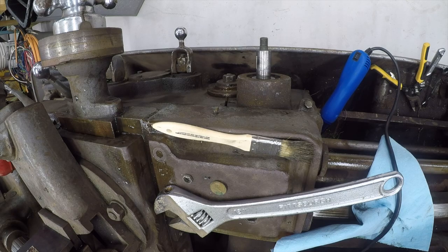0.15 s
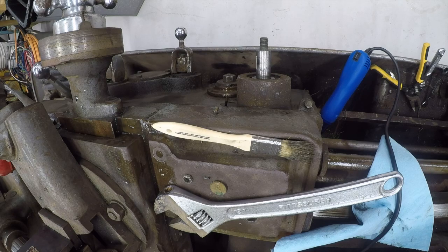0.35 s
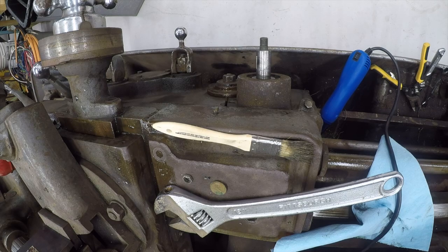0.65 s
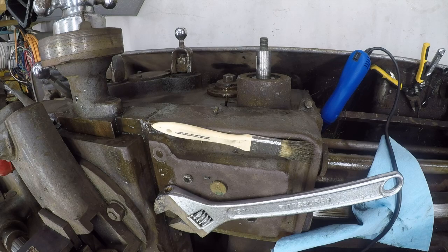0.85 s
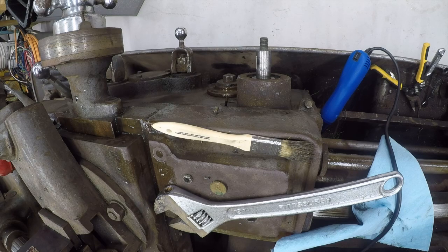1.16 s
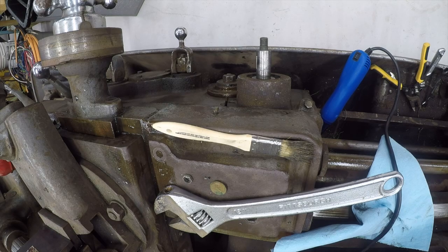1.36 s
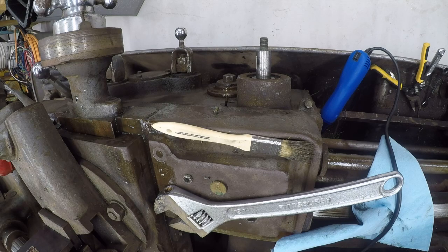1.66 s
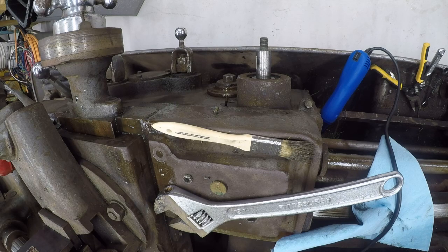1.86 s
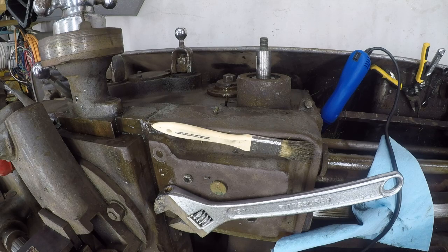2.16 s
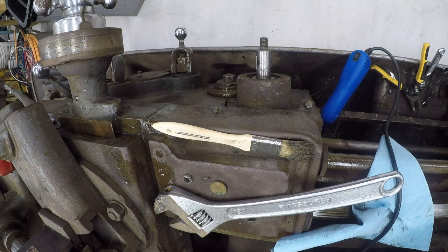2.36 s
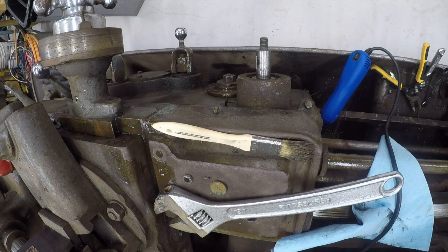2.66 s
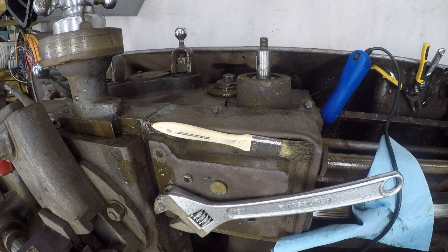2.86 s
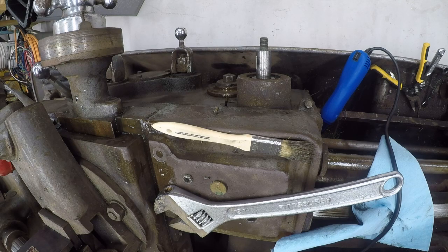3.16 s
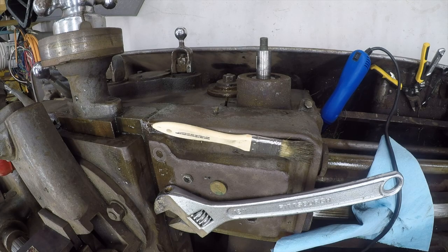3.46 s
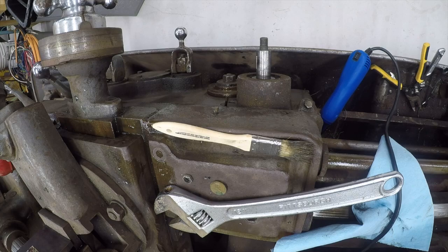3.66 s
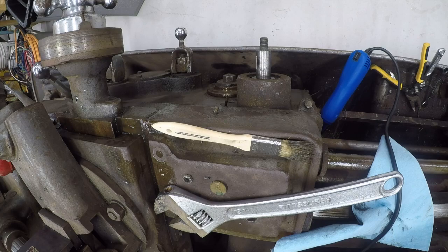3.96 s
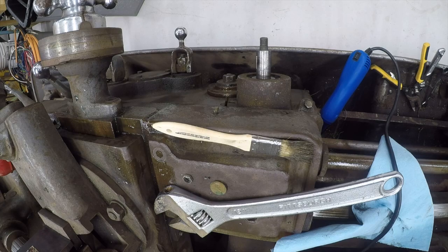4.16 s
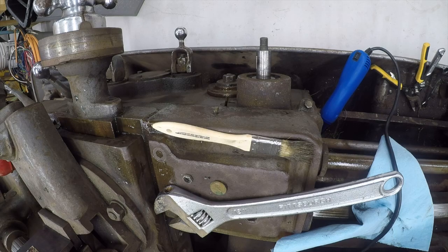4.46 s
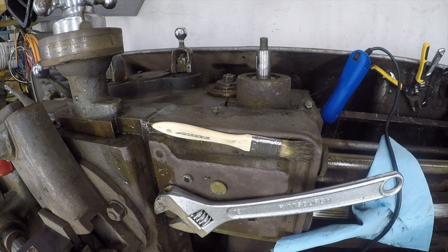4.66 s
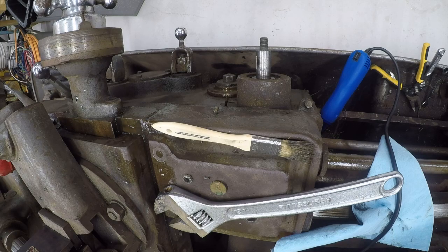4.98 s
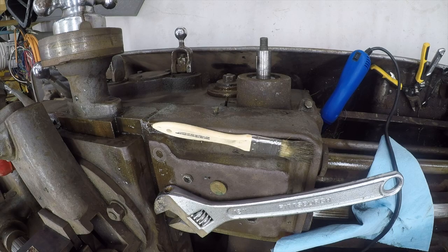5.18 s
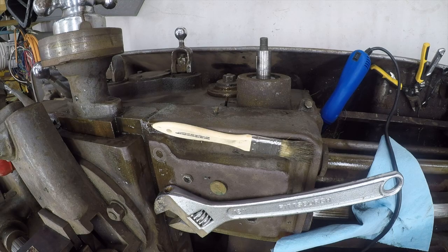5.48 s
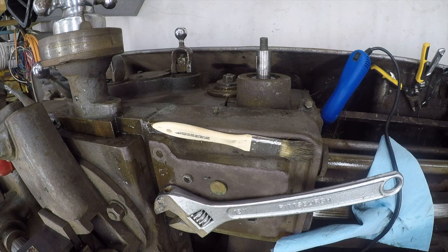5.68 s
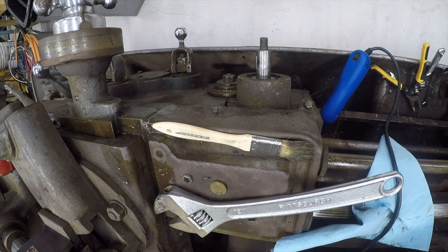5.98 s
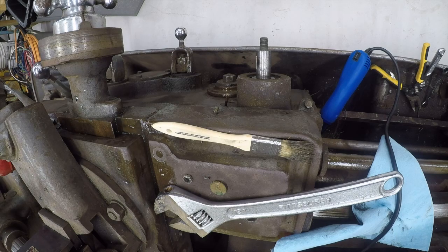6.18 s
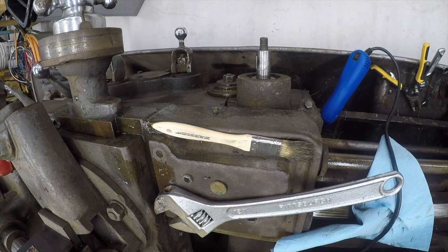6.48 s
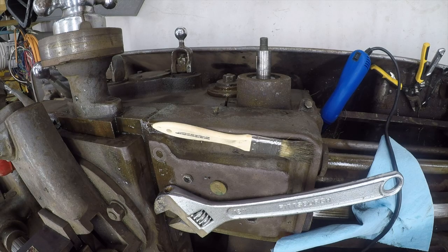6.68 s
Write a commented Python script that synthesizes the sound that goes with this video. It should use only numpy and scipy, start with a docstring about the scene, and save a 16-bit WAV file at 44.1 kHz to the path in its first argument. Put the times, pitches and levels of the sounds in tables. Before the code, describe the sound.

In a workshop, ventilation rumbles and hums steadily while someone goes through a nearby steel drawer cabinet. First a drawer clatters open, its loose tools ringing briefly. A lull follows, then a louder run of metallic knocks and a booming slam. Afterwards come softer clinks, hissy scraping from the runners and one last light knock, each with a short room echo.

```python
"""A steel drawer cabinet is opened, rummaged in and banged shut in a workshop.
Knocks and scraping runners shake the sheet steel into a noisy rattle; the drawer rings, the large
panels boom and loose tools clink. Once, a faint high whistle swells in. The room reverberates.
Behind it, ventilation rumbles and drives the room's lowest resonance into a wavering hum."""
import sys
import numpy as np
from scipy import signal
from scipy.fft import rfft, irfft, next_fast_len
from scipy.io import wavfile
from scipy.ndimage import uniform_filter1d, map_coordinates

SR = 44100
rng = np.random.default_rng(int(sys.argv[2]) if len(sys.argv) > 2 else 0)


def persist_wave(psi):
    """Save psi, clipped to +-1, as 16-bit WAV."""
    counts = np.round(np.clip(psi, -1, 1) * 32767).astype(np.int16)
    wavfile.write(sys.argv[1], SR, np.atleast_2d(counts).T)


N = 301203


# Drawer knocks: t/s, bright level/dB, dull re bright/dB, rattle t60/s, ring re bright/dB
KNOCKS = [(0.0867, -25, -3, 0.52, -24.5), (0.2027, -14.5, -3.5, .1, -29), (0.246, -8.5, -8, 0.37, -27),
          (0.3735, -44.5, 19.5, 0.36, -22), (0.428, -29, -5, 0.4, -24), (0.6477, -31, 0.5, 0.23, -36),
          (2.909, -32, -26, 0.069, -16), (3.1945, -14, -6, 0.49, -24), (3.227, -17, -16, 0.089, -33),
          (3.383, -9.5, -2, 0.085, -32), (3.3925, -15.5, 2.5, 0.43, -34), (3.5955, -25.5, -20, 0.25, -30),
          (3.7653, -32.5, -4, 0.097, -37), (3.959, -31, 4.5, 0.45, -28), (4.02, -33, 1, .1, -30),
          (4.035, -29.5, 2, 0.14, -28), (4.6194, -45, 0, .12, -34), (4.973, -31, -14, 0.058, -22),
          (5.0005, -39, -8, 0.16, -28), (5.3522, -37.5, -12, 0.75, -32), (5.7736, -44.5, 6, .12, -30),
          (6.347, -34.5, 7.5, 0.34, -34)]

def knocks(grit):
    """Bright, dull and crack power envelopes: first contact cracks, the blow fades, loose parts rattle."""
    blow_db, blow_t60_s, crack_db, crack_t60_s = -9, 0.18, -13.5, 0.026
    rattle_db, dull_stretch, hard_db = -11, 1.36, -14
    bright, dull, crack = np.zeros((3, N))
    for start, db, dull_db, t60, _ in KNOCKS:
        span = slice(round(start * SR), round(start * SR) + SR // 2)
        t = np.arange(len(grit[span])) / SR
        for power, level, age in (bright, db, t), (dull, db + dull_db, t / dull_stretch):
            blow = amp(blow_db - 60 * age / blow_t60_s) ** 2
            loose = grit[span] * amp(rattle_db - 60 * age / t60) ** 2
            power[span] += amp(level) ** 2 * (blow + loose) * (1 - np.exp(-age / 0.0024))
        contact_db = db + crack_db - 0.5 * max(hard_db - db, 0)  # soft blows crack less
        crack[span] += amp(contact_db - 60 * t / crack_t60_s) ** 2 * (1 - np.exp(-t / 0.0007))
    return bright, dull, crack


# Drawer slides: t/s, rise/s, hold/s, scrape level/dB, dull re scrape/dB
SLIDES = [(-.05, 0.04, 0.078, -46.5, 3), (3.087, 0.055, 0.053, -46, 4.5), (3.327, 0.046, 0.011, -37, 5),
          (3.535, 0.024, 0.029, -42, -18), (4.767, 0.075, .01, -50, -0.5), (5.464, 0.11, 0.023, -46, -2.5),
          (5.588, 0.12, 0.15, -36.5, -10), (5.838, 0.11, 0.12, -34.5, -9.5)]

def slides(grit):
    """Dull and scrape power envelopes: the drawer speeds up, holds and stops on juddering runners."""
    release_db_per_s = 226
    t = np.arange(N) / SR
    judder = amp(0.4 * wobble(22) + 0.6 * wobble(110))
    dull, scrape = np.zeros((2, N))
    for start, rise, hold, db, dull_db in SLIDES:
        speed_up = np.clip((t - start) / rise, 0, 1) ** 2
        release = amp(-release_db_per_s * np.maximum(t - start - rise - hold, 0))
        power = grit * (amp(db) * speed_up * release * judder) ** 2
        scrape += power
        dull += power * amp(dull_db) ** 2
    return dull, scrape


# Spectra of bright steel, dull steel, runners and first contact: f/Hz, relative density/dB
BRIGHT = [(1880, -11.5), (3200, -7.5), (3500, -7.5), (4870, -8), (6890, 1), (8150, -10), (9390, -12),
          (11100, -24), (12900, -29), (14900, -41)]
DULL = [(210, -24), (350, -2.5), (690, -7.5), (809, -5.5), (1000, -7), (1600, -8), (2000, -9),
        (2600, -17.5), (3800, -18.5), (4940, -37), (8360, -120)]
SCRAPE = [(1180, -42), (2000, -9), (2600, -7.5), (4190, -7.5), (5800, -1), (6600, 0.5), (7540, -3),
          (9950, -15.5), (11400, -29), (14900, -34)]
CRACK = [(300, -22), (1000, -16), (1700, -11), (3500, -23), (6800, 5), (9000, -2), (12000, -7),
         (14900, -19)]
# Cabinet stereo likeness: f/Hz, coherence
CABINET_COHERENCE = [(60, 0.57), (240, 0.99), (410, 0.99), (700, 0.58), (1200, 1), (2000, 0.6),
                     (3500, 0.84), (5810, 0.56), (9000, 0.3), (14500, .2)]
# Cabinet balance: f/Hz, left re right/dB
CABINET_BALANCE = [(240, 0.0), (410, 2.5), (700, -3.5), (1200, -4), (2000, -1.5), (3500, -2), (5810, -0.5),
                   (9000, -3.5), (14500, 3)]
# Cabinet phase: f/Hz, left lead/rad
CABINET_LEAD = [(300, -0.5), (700, 0.7), (1200, 1.1), (2000, 1.05), (3600, -0.34), (5800, -1), (9200, -1.5),
                (12500, -3)]

def rattle():
    """Knocks and slides shake sheet steel whose modes are too dense to hear apart."""
    grit = amp(0.67 * wobble(60) + 0.32 * wobble(250)) ** 2  # uneven contact
    bright, knock_dull, crack = knocks(grit)
    slide_dull, scrape = slides(grit)
    place = CABINET_COHERENCE, CABINET_BALANCE, CABINET_LEAD
    return (np.sqrt(bright) * stereo_noise(BRIGHT, *place, patchy_db=3, patch_bins=2)
            + np.sqrt(knock_dull + slide_dull) * stereo_noise(DULL, *place, patchy_db=3, patch_bins=2)
            + np.sqrt(scrape) * stereo_noise(SCRAPE, *place, patchy_db=-0.5)
            + np.sqrt(crack) * stereo_noise(CRACK, *place, patchy_db=0.5))


# Clearest drawer modes: f/Hz, level/dB, t60/s
DRAWER_MODES = [(1278, -1.5, 0.14), (1930, -17, 0.1), (3200, -24, 0.23), (3700, -28, 0.15),
                (4100, -26, .15), (5500, -12, .15), (6640, -5, 0.17), (6740, 0, .1), (7100, 4, 0.075)]

def drawer_ring():
    """Every knock rings the drawer's modes in a new mix."""
    ring = np.zeros(N)
    for start, db, *_, ring_db in KNOCKS:
        strike(ring, start, db + ring_db, DRAWER_MODES, attack_s=0.0034, scatter_db=4.5, jostle=0.6)
    return ring * amp([[-1.1], [1.1]])


# Blows on the panels: t/s, level/dB, attack/s, tilt/(dB/octave)
BOOMS = [(.27, -21.5, 0.01, -8.5), (.49, -23.5, 0.0093, -11.5), (3.399, -7, 0.0057, 5.5),
         (3.42, -6, 0.013, -19.5), (3.461, -12, 0.0062, 8), (3.52, -17, 0.0081, -3),
         (3.98, -12, 0.022, -15.5), (6.37, -24.5, 0.019, -15)]
# Panel modes: f/Hz, level/dB, t60/s
PANEL_MODES = [(167.2, 5, 0.24), (202.7, 6, 0.11), (223.8, 2.5, 0.19), (240, -3.5, 0.15), (294, -9.5, 0.21),
               (328.5, -17.5, 0.16), (365, -17.5, 0.11), (444.4, -18, 0.18), (507, -21, 0.16),
               (580, -21.5, 0.26), (605, -24, 0.16), (654, -23.5, 0.2), (834, -26, 0.1)]

def panels():
    """The cabinet's large panels boom; where a blow lands sets the mix of modes."""
    pivot_hz, tilt_top_hz = 200, 300
    boom = np.zeros(N)
    for start, db, attack, tilt in BOOMS:
        modes = [(hz, level + tilt * np.log2(min(hz, tilt_top_hz) / pivot_hz), t60)
                 for hz, level, t60 in PANEL_MODES]
        strike(boom, start, db, modes, attack, scatter_db=0.6)
    return -boom


# Modes per clink, and of the whistle near 11 kHz: f/Hz, level/dB, t60/s
RING_MODES = { "drawer front": [(1834, -3, 0.19), (2000, -10, .2), (3200, -24, .15), (3720, -11, .2),
              (5460, -9, .15), (5850, -7, .2), (6250, -2, .1), (6634, 4, .2), (6650, 5, .2), (6970, 0, .15),
              (7300, -11, .2), (7677, -8, .2), (9300, -19, .1)], "drawer back": [(1364, -5, .08),
              (1693, 1, 0.067), (1844, -2, .06), (2530, -2, 0.082), (2869, -4, 0.087), (3461, -2, .09),
              (4565, -6, .08), (6120, -9, .1), (6630, -7, .08), (7224, 4, 0.054), (7840, 0, .07)],
              "rail": [(1993, 2, 0.13), (3720, 0, .25), (3830, -4, .2), (5815, -4, 0.18)],
              "pin": [(8830, 0, 0.27)], "socket": [(6080, -2.5, 0.5), (6060, -2, 0.28), (5960, -6, .15)],
              "hook": [(8800, 0, 0.62)], "lid": [(1140, -3, .08), (1580, 6, .1), (1770, -1, .09),
              (1905, 0, 0.12), (2200, -2, .09), (2350, -3, .08), (2750, -5, .08)], "bit": [(10960, -1, 1.1),
              (11060, -5, 1.2)], "washer": [(6130, 3, 0.15), (6010, 1, .12), (6300, -5, .07),
              (6900, -9, .08)], "clamp": [(3600, -4, .05), (3790, -5, .05), (3870, 5, 0.056),
              (4080, -2, .04), (4260, -5, .05), (5050, 1.5, .05), (5570, -5, 0.054), (6900, -3, .04)],
              "tin box": [(743, -2, 0.15), (1104, -1, 0.14), (1250, -4.5, 0.09), (1390, -1, 0.11),
              (1563, -3, 0.1), (1920, -20, 0.081), (2040, -10, 0.062)], "spanner": [(1420, -14, 0.08),
              (4525, -3.5, 0.18), (6050, -5, 0.4), (7272, 7, 0.17), (9451, -14, 0.39), (10070, -14, 0.14),
              (12100, -32, 0.1)]}
# Clinks and the whistle: t/s, level/dB, mode set, attack/s, muffled after/s
RINGS = [(.2026, -32, "drawer front", .002, 0.0092), (.2463, -30, "drawer front", 0.0047, .07),
         (.284, -30.5, "rail", 0.0048, .12), (.335, -45, "hook", .01, 0.14),
         (.378, -33.5, "tin box", .002, .1), (.438, -36.5, "tin box", .002, .03),
         (0.938, -54, "washer", .002, .07), (3.125, -48, "hook", .004, 0.025),
         (3.198, -27, "drawer back", 0.0034, .03), (3.227, -27, "drawer back", 0.0037, .06),
         (3.545, -52, "bit", .05, 0.11), (3.572, -35, "socket", .008, 0.04),
         (3.618, -37, "pin", 0.0043, .2), (3.623, -35.5, "socket", .002, 0.14),
         (3.766, -46, "clamp", .001, 0.017), (3.962, -44.5, "washer", .002, .03),
         (3.98, -49, "spanner", .01, .06), (4.035, -36, "spanner", .002, 0.099),
         (5.772, -39.5, "tin box", .001, .015), (6.35, -43.5, "lid", .001, .04)]

def clinks_and_whistle():
    """Steel parts touch and ring briefly; "bit" is a faint, fuzzy 11 kHz whistle that swells in slowly."""
    rings = np.zeros(N)
    for start, db, name, attack, muffle_s in RINGS:
        strike(rings, start, db, RING_MODES[name], attack, scatter_db=3.5, muffle_s=muffle_s, jostle=0.6)
    return rings * amp([[-0.6], [0.6]])


# Room decay: f/Hz, t60/s
ROOM_T60 = [(200, 0.59), (2000, 0.73), (10000, 0.28)]
# Room stereo likeness: f/Hz, coherence
ROOM_COHERENCE = [(250, .97), (700, 0.41), (3500, 0.42), (9000, .1)]

def reverb(x):
    """Each frequency dies in the room at its own rate; long waves reach both channels alike."""
    hz, t, (left, other) = signal.stft(rng.standard_normal((2, SR // 2)), SR, nperseg=256)
    alike = np.clip(log_interp(ROOM_COHERENCE, hz), 0, 1)[:, None]
    right = alike * left + np.sqrt(1 - alike ** 2) * other
    decay = amp(-60 * t / log_interp(ROOM_T60, hz)[:, None])
    tail = signal.istft(np.array([left, right]) * decay, SR, nperseg=256)[1]
    delayed = np.pad(x, ((0, 0), (300, 0)))
    return signal.fftconvolve(delayed, tail / np.linalg.norm(tail[0]), axes=1)[:, :N]


# Lowest room resonance: t/s, level/dB
HUM_LEVEL = [(0.0, -25), (0.05, -17.5), (0.42, -30.5), (0.7, -15), (0.74, -33), (0.84, -22), (1.06, -20),
             (1.12, -28.5), (1.41, -14), (1.77, -15.5), (1.86, -28), (2.04, -18.5), (2.09, -26.5),
             (2.34, -20.5), (2.42, -29), (2.61, -14.5), (2.68, -23.5), (3.33, -23.5), (3.38, -13.5),
             (3.44, -30), (3.52, -24.5), (4.15, -26), (4.19, -45), (4.26, -23), (4.75, -29), (4.93, -19.5),
             (5.17, -38), (5.21, -25), (5.27, -47), (5.36, -18), (5.55, -32.5), (5.86, -28), (5.91, -59),
             (6.22, -23), (6.26, -33), (6.83, -20)]

def room_hum():
    """Ventilation drives the room's lowest resonance unsteadily; pitch and level waver."""
    hum_hz, waver_hz = 58.9, 2.57
    level_db = np.interp(np.arange(N) / SR, *np.transpose(HUM_LEVEL))
    phase = 2 * np.pi * np.cumsum(hum_hz + waver_hz * wobble(5.5)) / SR
    drive = 1 + 0.28 * (wobble(14) + 1j * wobble(21))
    return amp(level_db) * np.sqrt(2) * np.real(drive * np.exp(1j * phase))


# Ventilation and microphone hiss: f/Hz, relative density/dB
AIR = [(45, -31.5), (76, -8), (91, -14.5), (129, -12), (161, -16), (256, -19), (327, -24), (357, -29),
       (399, -30.5), (693, -38), (883, -35), (1010, -39.5), (1370, -40.5), (2500, -51), (4800, -57.5),
       (7500, -56.5), (10000, -62), (14900, -78.5)]
# Air stereo likeness: f/Hz, coherence
AIR_COHERENCE = [(60, 1.0), (130, 0.97), (240, 0.98), (410, 0.91), (700, 0.28), (1200, 0.13), (2000, 0.67),
                 (3500, 0.18), (5500, 0.05), (14500, 0.12)]
# Air balance: f/Hz, left re right/dB
AIR_BALANCE = [(60, 0), (240, -0.5), (410, 2.5), (700, -4), (1200, -6.5), (2000, -3.5), (3500, -1),
               (6620, -3), (14500, -1)]
# Air phase: f/Hz, left lead/rad
AIR_LEAD = [(0, 0), (430, -0.02), (680, 2), (1100, 2.5), (1900, 2), (2840, 0), (14600, -1.5)]

def ventilation():
    """Steady air noise over a slowly sinking rumble below and above the hum."""
    fade_db_per_s = 1.12
    below = amp(-28.5) * noise_band(centre_hz=30, width_hz=11)
    above = amp(-29) * noise_band(centre_hz=82, width_hz=9)
    rumble = amp(-fade_db_per_s * np.arange(N) / SR) * (below + above)
    air_db = -28 + 0.42 * wobble(1.99)
    return rumble + amp(air_db) * stereo_noise(AIR, AIR_COHERENCE, AIR_BALANCE, AIR_LEAD, patchy_db=0.41)


def strike(x, start_s, db, modes, attack_s, scatter_db, muffle_s=1, jostle=0):
    """Add one ring to x: modes start at random strengths, waver if jostled and decay, fast once muffled."""
    jostle_per_s, muffle_db_per_s = 110, 900
    t, ring = np.arange(SR // 2) / SR, 0
    knots = np.arange(jostle_per_s // 2 + 2) / jostle_per_s
    for hz, level, t60 in modes:
        a, b = rng.standard_normal((2, len(knots)))
        drive = (1 + jostle * np.interp(t, knots, a + 1j * b)) / np.sqrt(1 + jostle ** 2)
        decay = amp(level + scatter_db * a[-1] - 60 * t / t60)
        ring += decay * np.imag(drive * np.exp(2j * np.pi * hz * t))
    envelope = (1 - np.exp(-t / attack_s)) * amp(db - muffle_db_per_s * np.maximum(t - muffle_s, 0))
    part = x[round(start_s * SR):][:len(t)]
    part += (ring * envelope)[:len(part)]


def stereo_noise(spectrum, coherence, balance, lead, patchy_db, patch_bins=6):
    """Unit-rms stereo noise, patchy in time and frequency."""
    def mid_side(hz):
        angle = np.arccos(np.clip(log_interp(coherence, hz), -1, 1)) / 2
        return amp(log_interp(spectrum, hz)) * [np.cos(angle), np.sin(angle)]

    def pan(hz):
        left = amp(log_interp(balance, hz) / 2) * np.exp(0.5j * log_interp(lead, hz))
        return np.array([left, 1 / left])

    white = signal.stft(rng.standard_normal((2, N + 512)), nperseg=512)[2]
    patches = uniform_filter1d(rng.standard_normal(white.shape[1:]), size=patch_bins, axis=0)
    patches = unit_rms(uniform_filter1d(patches, size=10, axis=1))
    pair = signal.istft(white * amp(patchy_db * patches), nperseg=512)[1][:, :N]
    mid, side = filtered(pair, mid_side)
    return unit_rms(filtered(np.array([mid + side, mid - side]), pan))


def noise_band(centre_hz, width_hz):
    return unit_rms(filtered(rng.standard_normal(N), lambda f: np.exp(-((f - centre_hz) / width_hz) ** 2)))


def wobble(knots_per_s):
    """Smooth random curve."""
    knots = rng.standard_normal(int(N * knots_per_s / SR) + 4)
    return map_coordinates(knots, [np.arange(N) * knots_per_s / SR])


def filtered(x, response):
    size = next_fast_len(N + SR // 2)
    return irfft(rfft(x, size) * response(np.fft.rfftfreq(size, 1 / SR)), size)[..., :N]


def log_interp(points, hz):
    f, value = np.transpose(points)
    return np.interp(np.log(hz + 1), np.log(f + 1), value)


def amp(db):
    return 10 ** (np.asarray(db) / 20)


def unit_rms(x):
    return x / np.sqrt(np.mean(x ** 2) + 1e-20)


def scene():
    """Cabinet, clinks and whistle in the room, over hum and ventilation."""
    clatter, rings = rattle() + drawer_ring(), clinks_and_whistle()
    room = amp(-7.5) * reverb(clatter) + amp(-12) * reverb(rings)
    return clatter + panels() + rings + room + room_hum() + ventilation()


def record(dry):
    """The input stage rounds off the loudest peaks and passes nothing above its band limit."""
    full_scale, top_hz = 0.97, 15100
    rounded = dry / (1 + np.abs(dry / full_scale) ** 4) ** (1 / 4)
    return filtered(rounded, lambda hz: hz < top_hz)


dry = scene()
out = record(dry)
persist_wave(out)
```